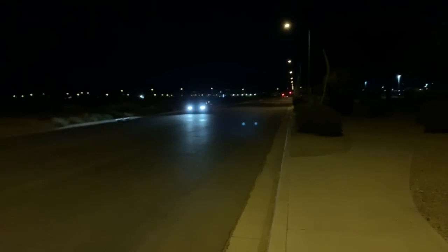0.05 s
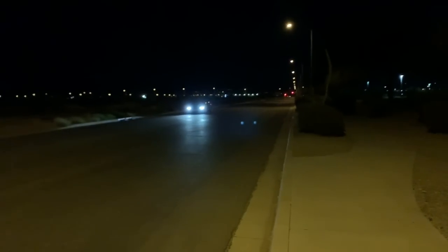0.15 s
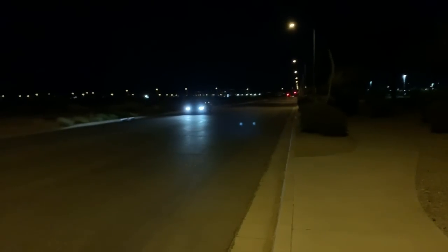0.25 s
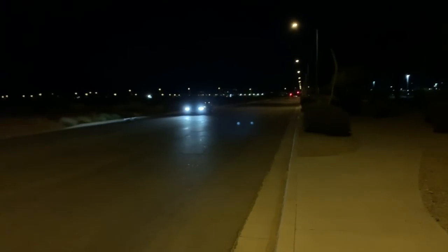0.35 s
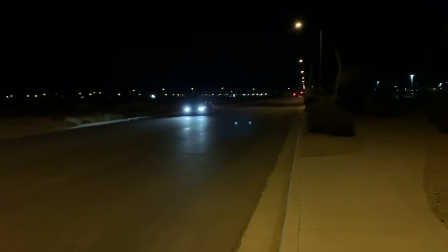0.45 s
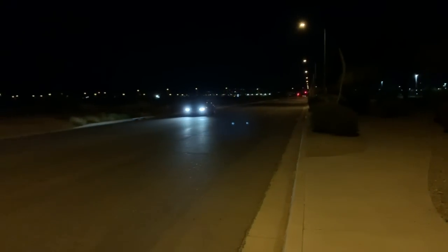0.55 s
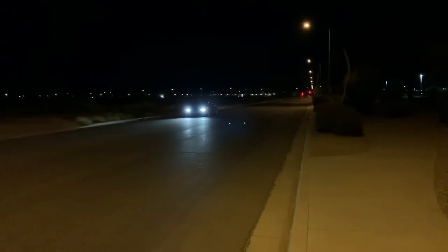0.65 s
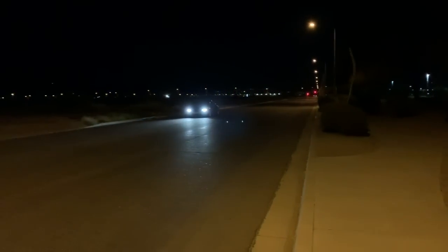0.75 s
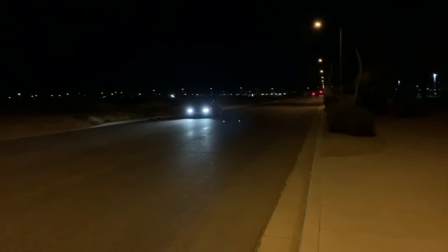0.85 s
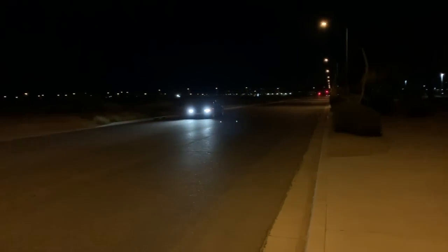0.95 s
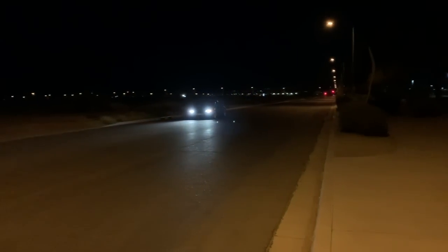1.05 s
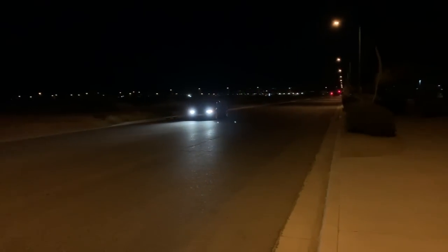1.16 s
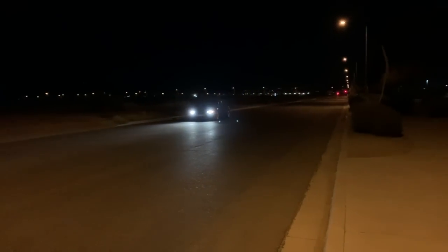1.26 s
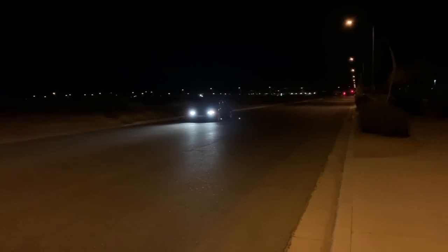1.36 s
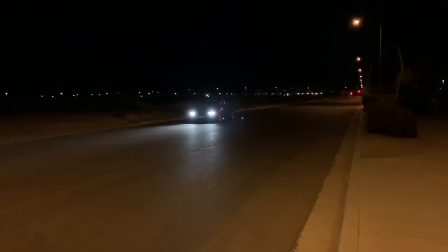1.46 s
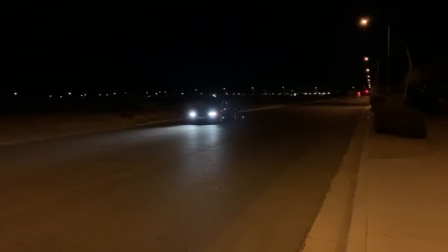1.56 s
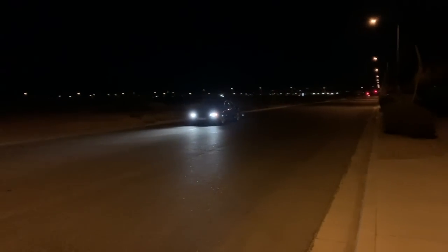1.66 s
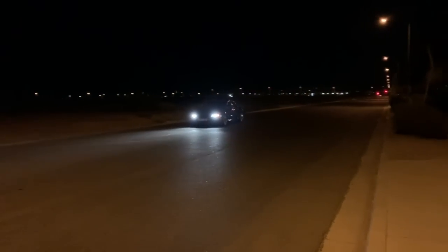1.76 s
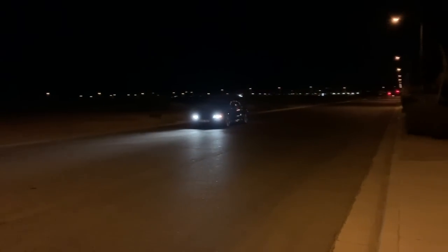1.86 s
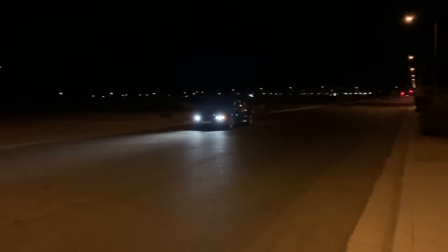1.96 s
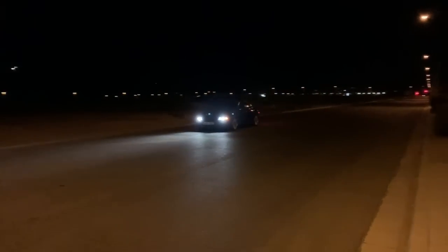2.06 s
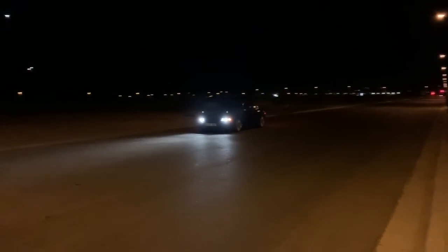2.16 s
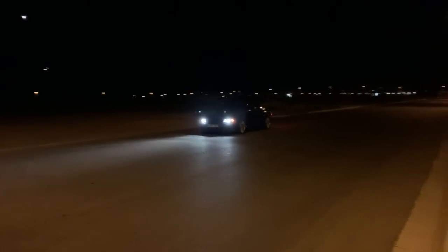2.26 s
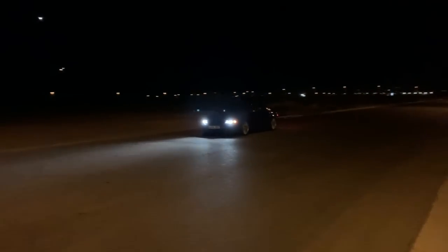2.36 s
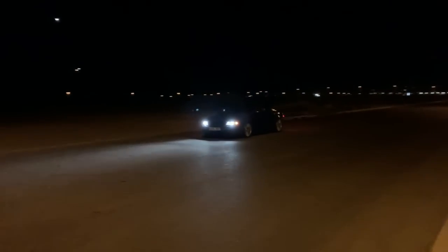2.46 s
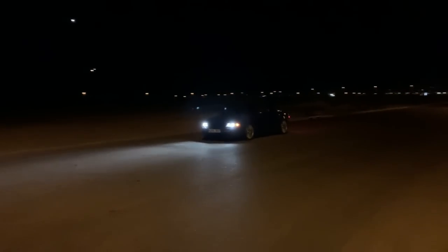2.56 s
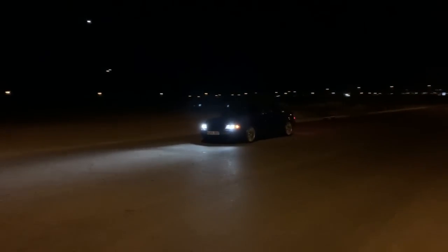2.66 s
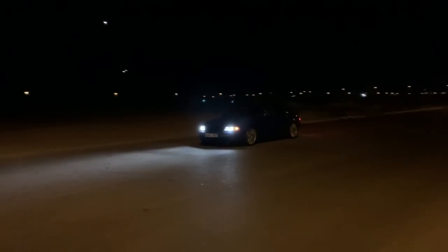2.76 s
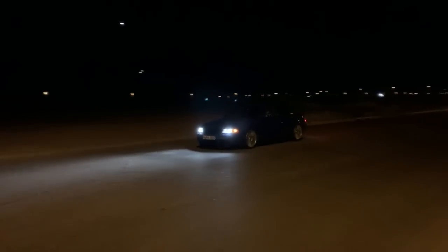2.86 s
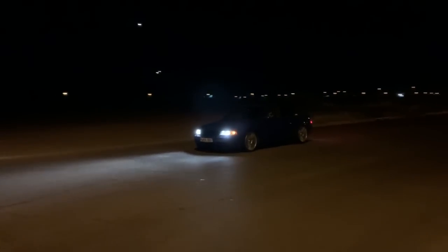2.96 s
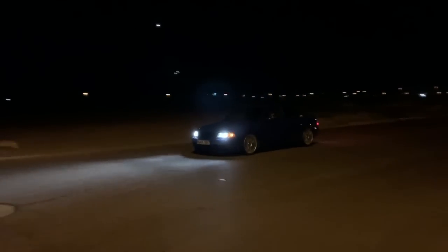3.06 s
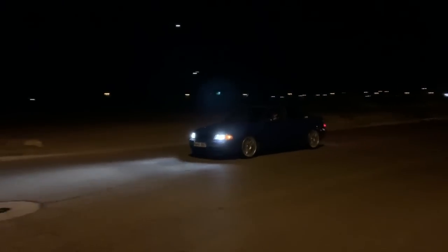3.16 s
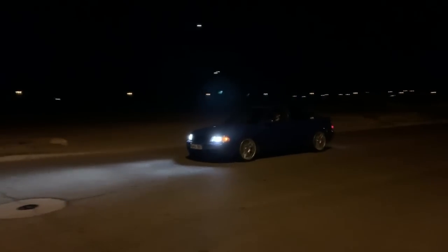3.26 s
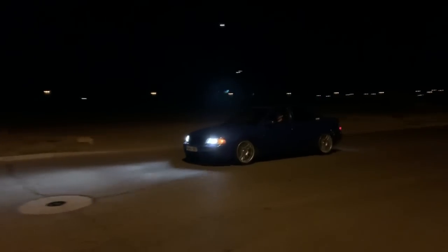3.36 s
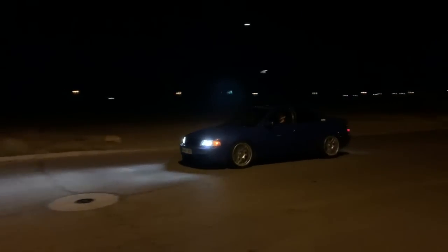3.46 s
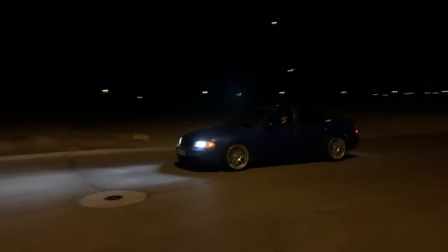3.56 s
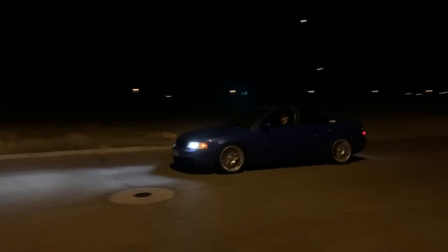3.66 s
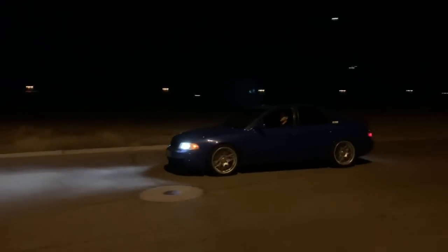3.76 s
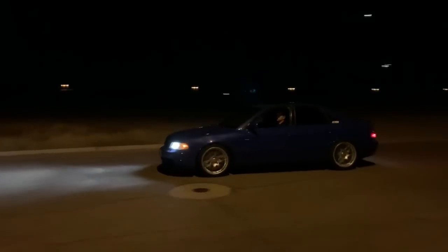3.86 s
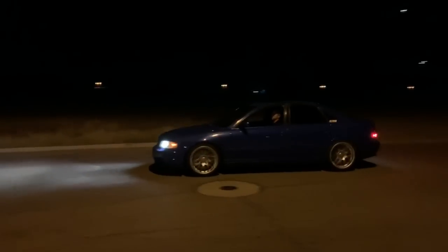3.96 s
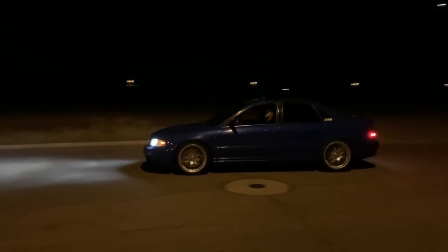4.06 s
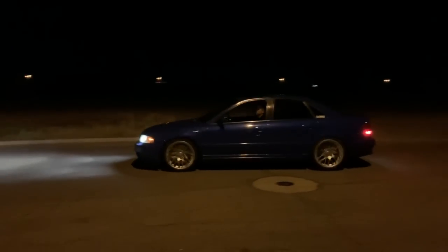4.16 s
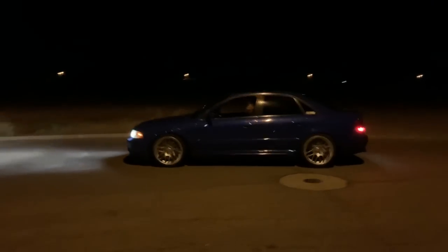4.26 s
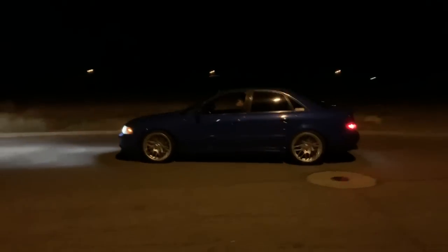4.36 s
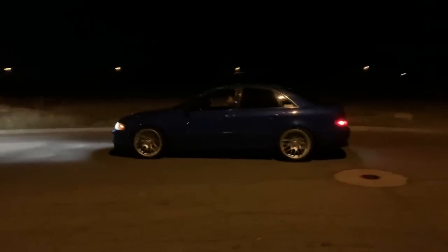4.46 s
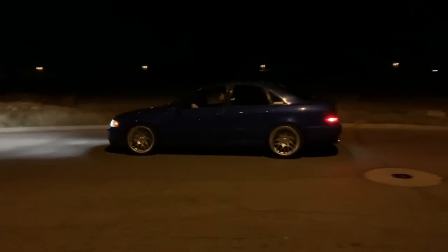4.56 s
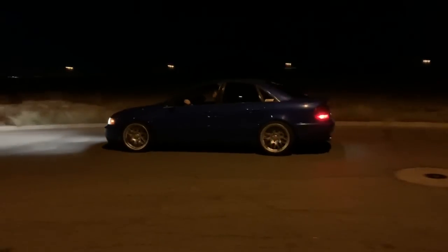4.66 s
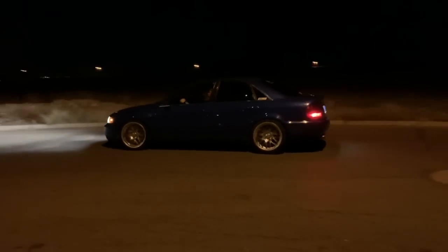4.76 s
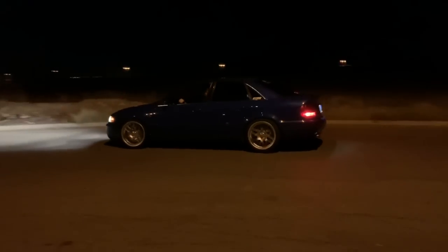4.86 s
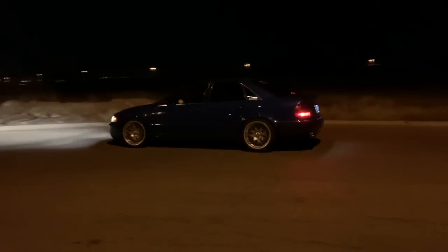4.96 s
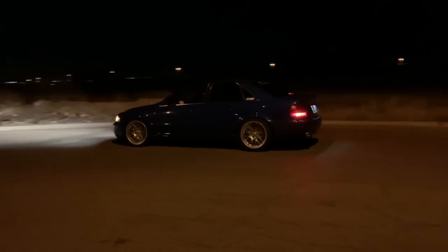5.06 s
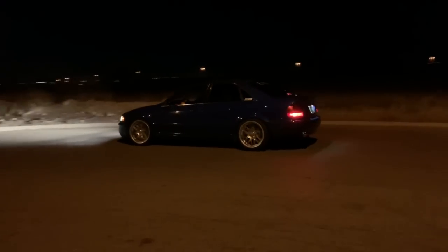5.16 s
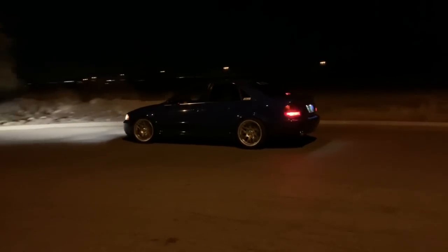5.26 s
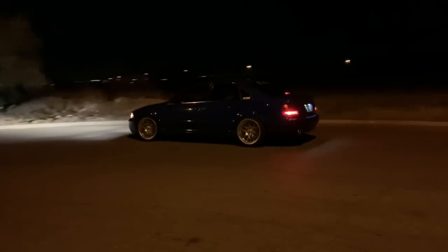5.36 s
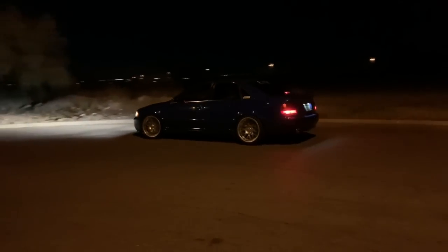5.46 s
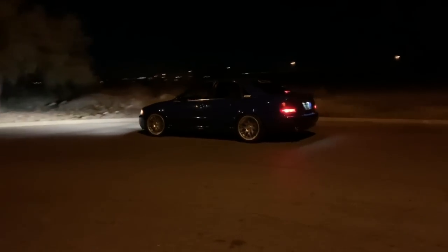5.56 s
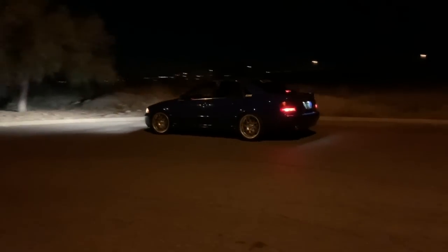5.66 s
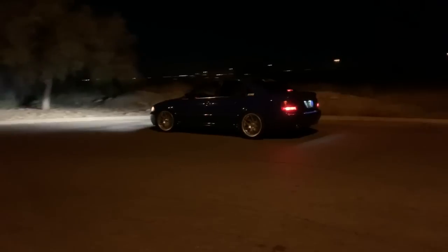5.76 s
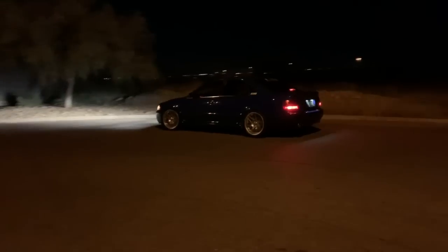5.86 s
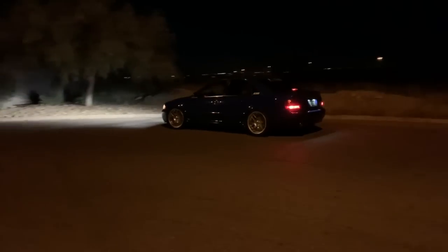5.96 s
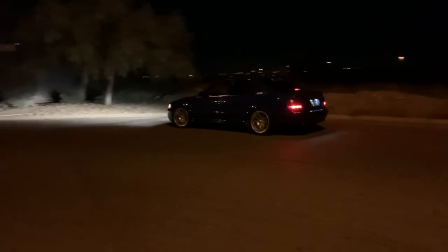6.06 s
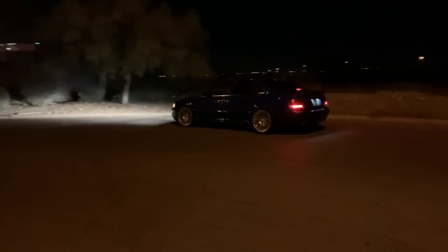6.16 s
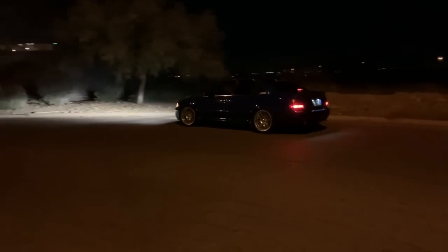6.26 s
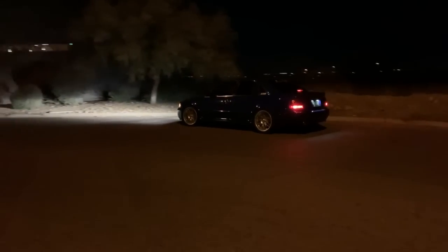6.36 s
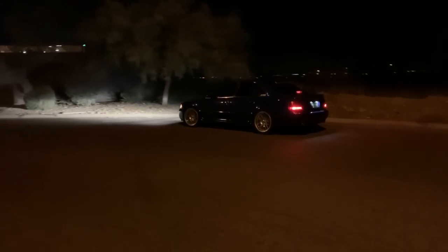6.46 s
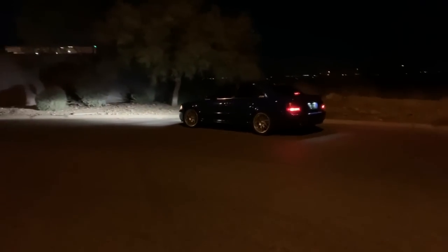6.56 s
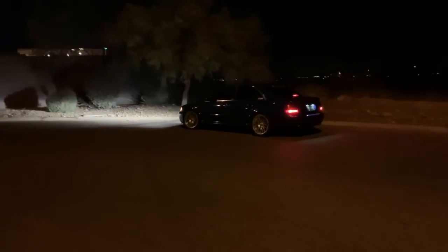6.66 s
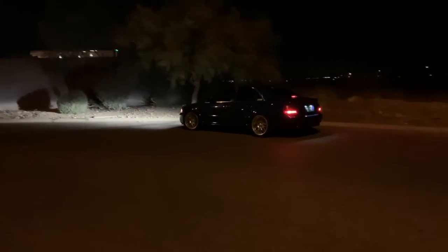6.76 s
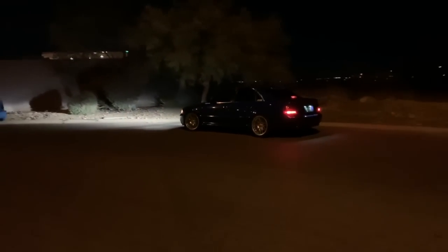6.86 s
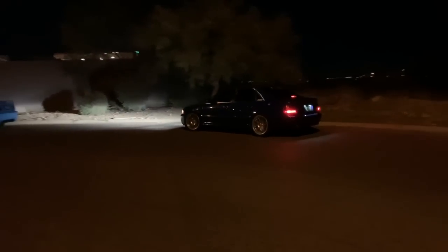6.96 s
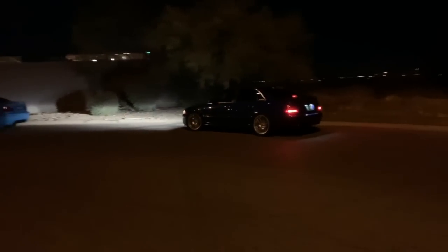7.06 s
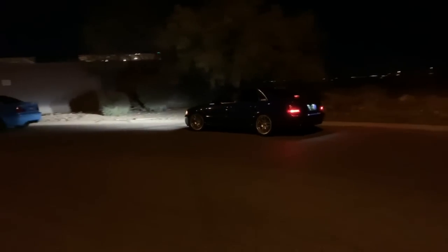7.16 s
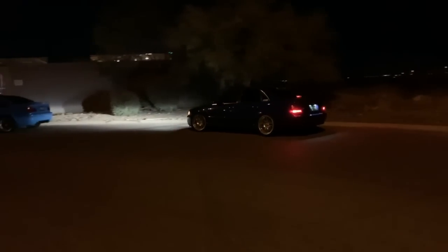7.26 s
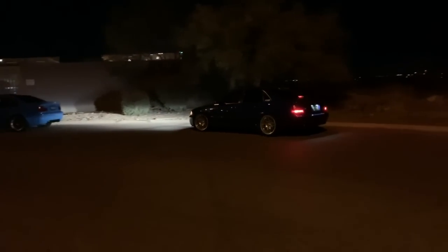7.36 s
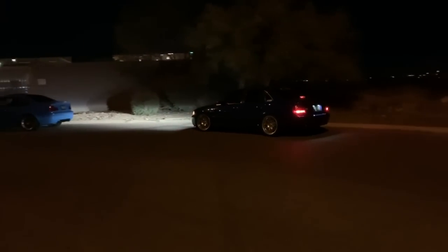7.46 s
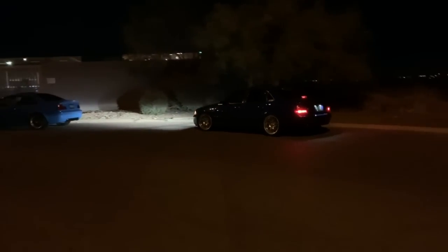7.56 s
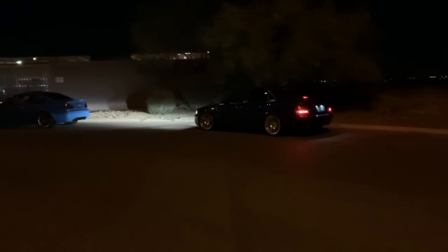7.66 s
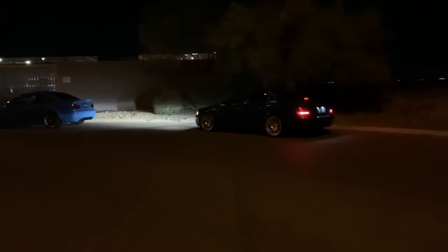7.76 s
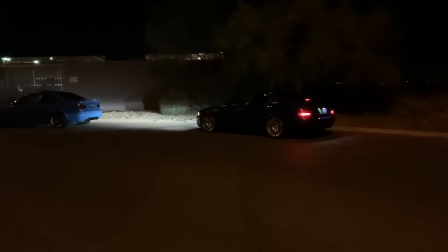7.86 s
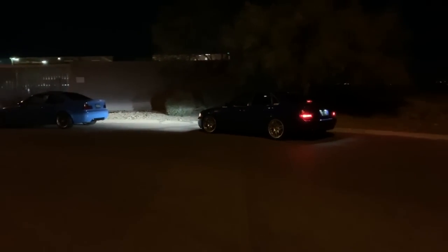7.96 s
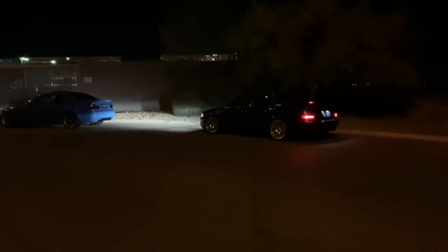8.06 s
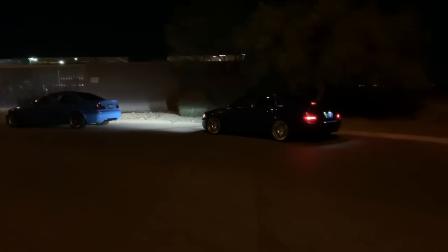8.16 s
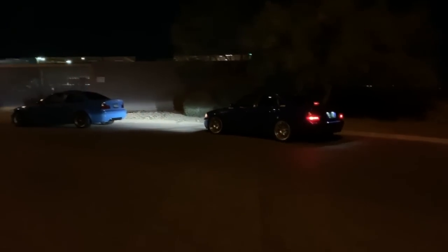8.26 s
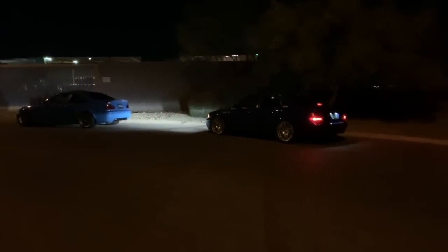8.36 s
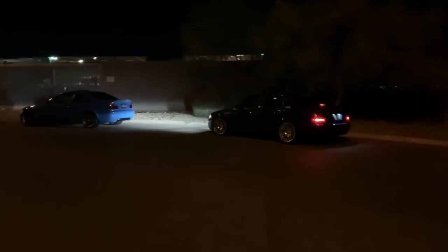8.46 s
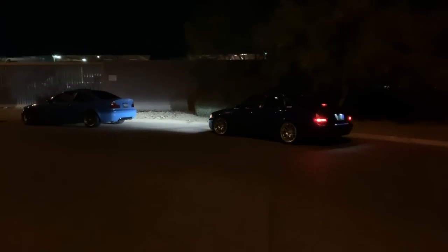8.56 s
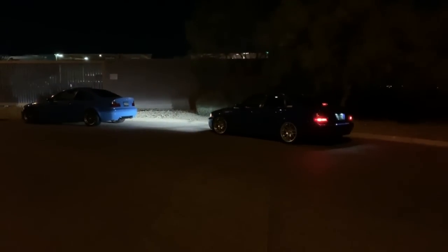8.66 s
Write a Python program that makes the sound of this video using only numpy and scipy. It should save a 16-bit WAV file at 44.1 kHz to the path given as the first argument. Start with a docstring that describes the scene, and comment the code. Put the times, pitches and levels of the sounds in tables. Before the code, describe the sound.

A turbocharged car blips its throttle, then coasts slowly past at night with dense exhaust pops, before its engine catches and settles into a lumpy idle.

```python
"""A turbocharged four-cylinder car blips its throttle, then coasts slowly past on an open road at night.
With the throttle shut, leftover fuel pops in the exhaust and rings the pipe, with a thin echo around it.
Just after the car passes, the engine catches, limps and settles to idle; near the end there is a soft scuff.
Throughout, filtered noise makes tyre roar and hissing air, and short bursts make sand and flicked grit.
Two microphone ports listen from the kerb."""
import sys
import numpy as np
from scipy import signal
from scipy.fft import rfft, irfft
from scipy.io import wavfile
from scipy.ndimage import uniform_filter1d

SR = 44100
rng = np.random.default_rng(int(sys.argv[2]) if len(sys.argv) > 2 else 0)


def store_wav(level_fs):
    """Save 16-bit WAV to argv[1]."""
    pcm = np.round(np.clip(np.atleast_2d(level_fs), -1, 1) * 32767)
    wavfile.write(sys.argv[1], SR, pcm.T.astype(np.int16))


N = 384199

# How fast the engine fires. Each row: time in seconds, firing rate in Hz.
FIRING_RATE = [(0, 42), (.35, 44), (.62, 35), (.78, 44), (1.0, 67.36), (2.0, 60.48), (2.5, 55.1),
               (3.3, 47.43), (4.3, 40.68), (4.46, 43.04), (4.56, 56.3), (4.63, 62.1), (4.72, 59.7),
               (5.02, 50.9), (5.13, 48.4), (5.4, 44.2), (5.6, 42.3), (5.94, 41.3), (6.22, 41.0),
               (6.99, 41.3), (7.43, 42.4), (7.85, 42.6), (8.71, 41.9)]
# Pops in the exhaust. Each row: start in seconds, strength in dB, sharpness from 0 (dull thump) to 1 (bang),
# extra bark in dB, lean of the bark to the tailpipe's upper modes in dB.
POPS = [(0.329, -37, 0, -3, 0), (0.587, -27, 0.3, -2, -10), (0.706, -37.5, 0.07, -6, 0),
        (1.0256, -11.5, 0.99, 3, -6), (1.066, -15, 0.96, 7, -6), (1.193, -24.5, 0.8, 2, 1),
        (1.209, -25, 0, -3, 4), (1.292, -22, 0.54, 1.5, 3), (1.352, -17.5, 0.5, -0.5, 2),
        (1.532, -18.5, .45, 3.5, 2), (1.576, -24, 0.5, 0, -9), (1.708, -23, .3, 2, 4),
        (1.72, -20, 0.3, -5, 0), (1.74, -18.5, 0.43, 0, 1), (1.781, -28.5, 0.7, 7.5, 4),
        (1.868, -21, 0.58, 1, -2), (1.925, -20.5, 0.6, 1.5, 0), (1.943, -21.5, 0.53, -3, 0),
        (2.021, -23, 0.5, -0.5, 5), (2.092, -15.5, 0.3, 3, 5), (2.231, -16.5, 0.4, 2.5, 5),
        (2.345, -22, 0.5, 4, 1), (2.409, -19.5, 0.17, 1, -5), (2.43, -21, 0.1, 0, 0),
        (2.533, -14.5, 0.53, 3, 5), (2.597, -19, 0.06, 2, -4), (2.758, -18.5, 0.12, 2, -8),
        (2.784, -21, 0.05, -1, -5), (2.798, -24, 0.4, 4.5, -3), (2.808, -17.5, 0.15, 0, 5),
        (2.967, -14.5, 0.4, -0.5, -3), (2.999, -18.5, 0.63, -3, 1), (3.05, -21.5, 0.54, 2, 3),
        (3.188, -18.5, 0.63, 4, 1), (3.196, -14.5, 0.33, 1.5, 2.5), (3.24, -17.5, 0.36, -1, 8),
        (3.391, -12.5, 0.28, -3.5, -1), (3.413, -19, 0.45, 2.5, -3), (3.445, -16.5, 0.48, -1, -1),
        (3.502, -14, 0.21, -3, 3), (3.654, -18.5, 0.2, 3.5, 13), (3.667, -15.5, 0.3, 0.5, 5),
        (3.699, -18.5, 0.56, 0.5, -3), (3.713, -14, 0.45, -0.5, 0), (3.88, -14, 0.22, 3, 8),
        (3.918, -12.5, 0.52, 4.5, 5), (3.969, -18.5, 0.24, 5, 4), (4.156, -15, 0.06, 5, -5),
        (4.18, -17, 0.34, 2, 10), (4.204, -23, 0.36, 5, 2), (4.218, -20.5, 0, 3, 0),
        (4.239, -19.5, 0.34, -2.5, 1), (4.4, -14, 0.2, 2.5, -3), (4.438, -19, 0.28, -0.5, 2),
        (4.493, -20, 0.4, -0.5, -3.5), (4.549, -24.5, 0.13, 1, -16), (4.595, -22.5, 0, -0.5, -7)]
# Hot gas carries sound faster and raises the exhaust's modes. Each row: time in seconds,
# frequency ratio of the pipe, resonance of the silencer's air cavity in Hz.
HEAT = [(1.07, 1.53, 74.4), (1.3, 1.07, 67.5), (2.9, 1.07, 59.7), (3.3, 1.045, 60.9), (4.5, 1.01, 52.7)]
# Ringing modes. Each row: frequency in Hz, width in Hz, level in dB (the width also scales the level).
# First the whole exhaust pipe, then the tailpipe, then the tailpipe's high modes rung by a sharp bang.
PIPE_MODES = [(122.3, 33.6, 3.5), (162, 71, 1.5), (264, 85, 2.5)]
TAILPIPE_MODES = [(487, 48, -12), (604, 160, -2), (739, 51, 1.5), (775, 31, 3), (1112, 114, 0),
                  (1325, 140, 1)]
BANG_MODES = [(1270, 90, -3), (1814, 110, -1), (2280, 85, 2), (2850, 60, 0), (4550, 200, -24)]
# Grit flicked by the tyres. Each row: start in seconds, relative level in dB, main frequency in Hz.
GRIT = [(1.286, -44.5, 7200), (3.272, -49, 7800), (3.535, -54, 7000), (3.956, -38, 10500),
        (4.007, -41, 10500), (4.344, -44, 10000), (4.527, -44, 10000), (4.585, -40, 11000),
        (5.441, -49, 8100), (5.743, -41.5, 2600), (5.839, -52, 8000), (5.969, -42.5, 2820),
        (6.464, -39.5, 3380), (6.701, -44, 3500), (6.7525, -41.5, 3100), (6.9695, -32.5, 3200),
        (6.998, -43, 2980), (7.45, -47, 3114), (7.464, -47, 3730), (7.733, -49, 3100), (7.8982, -45, 2200),
        (7.958, -39, 2750)]
# Swells of a faint whine. Each row: time of the top in seconds, time to fall to about a third in seconds,
# frequency at the top in Hz (before it wavers), level in dB (before it flutters).
WHINES = [(.8, .22, 1110, -48), (2.04, .24, 1000, -46), (5.3, .98, 1170, -57), (8.1, .7, 1140, -60),
          (8.2, .7, 1640, -66), (7.9, 1.1, 2820, -71)]
# The right port against the left. Each row: frequency in Hz, phase lead in radians, extra level in dB.
PORTS = [(0, 0, .7), (150, .12, .7), (400, .24, .7), (1100, .48, 0), (1600, .65, 0), (2600, 0, .5),
         (3800, -1.4, 3), (5200, -3.1, 3), (6200, -5.6, 1), (7300, -6.28, 0), (8500, -5.5, 0),
         (10400, -3.14, 0), (13200, 0, 0), (16000, 0, 0)]

# Tone colours. Each row of all the tables below: frequency in Hz, relative level in dB.
# Engine: the firing pulses, then the difference between alternate firings, which makes the idle lope.
BEAT_COLOUR = [(20, -40), (42, -3.5), (60, 0), (84, 6), (125, 5), (168, 6.5), (205, -9), (235, -12.5),
               (275, -35), (330, -28.5), (430, -43), (1500, -90.5)]
LOPE_COLOUR = [(20, -36), (62, -1), (102, 3.5), (143, -3.5), (185, -8), (230, -13.5), (280, -39),
               (430, -46.5), (1500, -87.5)]
# Engine: gas puffs, the ring of harder firings in the pipe, the low rumble.
PUFF_COLOUR = [(200, -27.5), (380, 1.5), (520, 15.5), (720, 2.0), (900, -1.5), (1150, -12.0), (1600, 3.5),
               (4000, -40.0)]
FLARE_COLOUR = [(60, -50), (130, -24), (158, 5.5), (190, -1.5), (235, 9.5), (272, -4.5), (330, -15.5),
                (450, -12), (1500, -81)]
RUMBLE_COLOUR = [(15, -27), (30, 0), (60, -4), (110, -1), (180, -5), (255, -3), (330, -15), (420, -22),
                 (700, -20), (1500, -77.5)]
# Pops: the crack of the gas jet, the tick of the manifold, the roadside echo.
CRACK_COLOUR = [(600, 0), (1100, -1.5), (1500, -10.5), (1800, 0.5), (2030, -11), (2300, -1), (2600, -21.5),
                (2880, -6), (3400, -13.5), (5200, -20.5), (8000, -22), (12000, -28.5), (15500, -65)]
TICK_COLOUR = [(2000, -25), (5000, -10), (8000, 2.5), (13000, 0), (14500, -6), (15500, -15.5)]
ECHO_COLOUR = [(60, -1), (250, -8.0), (700, 0.0), (2000, 5.0), (3700, 8.5), (5000, 14.5), (12000, -19.5)]
# Car and road: tyre roar, hissing air, the scuff, fine sand.
TYRE_COLOUR = [(200, 9), (400, -5.5), (520, 1), (720, 4), (880, -3), (1020, 7), (1180, 4.5), (1460, -5),
               (1680, -2.5), (1900, -5.5), (2300, -6.5), (2800, -12), (3400, -46), (4500, -20), (8000, -68)]
AIR_COLOUR = [(1500, 12.5), (3000, 10), (4200, 4.5), (5300, -0.5), (7000, 1.5), (8500, 1), (10000, -13.5),
              (12500, -0.5), (14500, -14), (15500, -27)]
SCUFF_COLOUR = [(200, -19), (340, 1.5), (430, -0.5), (560, 0), (800, 3.5), (1000, -5), (1250, -21),
                (1800, -20), (3000, -23.5), (6000, -43)]
SAND_COLOUR = [(1000, -4.0), (3200, -4.0), (5500, -7), (9000, 9.0), (13000, -3.0), (15500, -14.5)]

# the drive: when the car is nearest, how far off, how fast then, and the time constant of its slowing
PASSES_S, KERB_M, SPEED_M_S, SLOWING_S = 4.116, 6.71, 3.95, 2.23
# the throttle shuts after the blip, the engine catches, the idle settles; CHANGE_S sets how fast each change is
LIFT_S, CATCH_S, SETTLED_S, CHANGE_S = 0.83, 4.6, 5.39, 0.046
# a sharp ignition barks, cracks and ticks more, a slow one thumps more: dB over the range of sharpness
SHARP_BARK_DB, SHARP_CRACK_DB, SHARP_TICK_DB, DULL_THUMP_DB = 5.5, 23.5, 35.5, 15.5
# leftover fuel may go off a few firings after a pop: chance for the dullest pop, change in level, sharpness
STRAGGLER_SHARE, STRAGGLER_DB, STRAGGLER_SHARPNESS = .45, -11, 0.3
# the manifold ticks this long before the pressure wave reaches the tailpipe
PIPE_TRAVEL_S = 0.0083
# the lope is strongest at idle speed or below and fades with a power of the speed above it
IDLE_HZ, LOPE_POWER = 41, 4
# spreads: rumble surges, firing strength, ring of the firings in the pipe
SURGE_DB, SCATTER_DB, STUMBLE_DB = 2, 1.15, 2.5
# until the idle settles: size of the limp, time of one of its hardest firings, extra spread in firing time
LIMP_DB, LIMP_S, STUMBLE_S = 4.5, 5.015, .00015
# bands of tyre roar that flicker on their own: frequencies, sharpness, spread, changes per second
TREAD_HZ, TREAD_Q, TREAD_DB, TREAD_RATE = [700, 1020, 1200, 1680, 2150, 2650], 8, 1.6, 16


def scene():
    """Mix the car, its pops, their echo and the sounds of the road."""
    pops = afterfire()
    car = engine() + pops + tyre_roar() + air_hiss() + whine()
    return car + grit() + scuff() + crunch() + roadside(pops)


def engine():
    """Each firing sends a pulse through the silencer; a smooth drone lies under them until the engine catches."""
    rate_hz, = curves(FIRING_RATE)
    phase = np.cumsum(rate_hz) / SR  # counts firings
    return firings(phase, rate_hz) + throb(phase) + drone(phase) + rumble()


def firings(phase, rate_hz, lope_db=-8, lope_lag_s=0.0017, jitter_s=0.00008, gas_db=-32):
    """Pulses of varying strength and timing, with puffs of gas, ring the silencer and the pipe."""
    k = np.arange(1, int(phase[-1]) + 1)
    chance = rng.standard_normal((len(k), 3))
    due = np.interp(k, phase, np.arange(N)).astype(int)
    unsettled = (after(CATCH_S) * (1 - after(SETTLED_S)))[due]
    late = (jitter_s + STUMBLE_S * unsettled) * SR * chance[:, 0]
    at = np.clip((due + late).astype(int), 0, N - 1)
    pulses, uneven, hard = np.zeros((3, N))
    # just after the catch the strength rises and falls over every four firings
    limp = unsettled * (np.cos(np.pi / 2 * (k - phase[int(LIMP_S * SR)])) - .25)
    pulses[at] = undb(SCATTER_DB * chance[:, 1] + LIMP_DB * limp)
    # alternate firings differ, most of all at low speed
    uneven[at] = (-1) ** k * np.minimum(IDLE_HZ / rate_hz[at], 1) ** LOPE_POWER
    hard[at] = undb(STUMBLE_DB * np.clip(chance[:, 2], -2, 1))
    lope = unit(colour(np.roll(uneven, int(lope_lag_s * SR)), LOPE_COLOUR)) * undb(lope_db)
    beat = smear(unit(colour(pulses, BEAT_COLOUR)) + lope, hz=88, q=.6)
    beat_db = heard(db=-27.0, near_power=0.86, overrun_db=-12.5, astern_db=13.5)
    return (beat + undb(gas_db) * puffs(phase)) * undb(beat_db) + flare(hard)


def smear(x, hz, q):
    """All-pass filter: a chamber holds back the part of each pulse near its resonance."""
    return 2 * signal.lfilter(*signal.iirpeak(hz, q, fs=SR), x) - x


def puffs(phase):
    """Rushing gas: noise that starts strong at each firing and dies away until the next."""
    return unit(np.exp(-(phase % 1) / 0.73) * noise(PUFF_COLOUR))


def flare(hard, catch_db=-31, top_s=4.68, fade_s=.5, idle_db=-50):
    """As the engine catches, harder firings ring the pipe's upper mode; a little of it stays at idle."""
    swell = np.exp(-np.abs(np.arange(N) / SR - top_s) / fade_s)
    effort = after(CATCH_S) * (undb(catch_db) * swell + undb(idle_db))
    return unit(colour(hard, FLARE_COLOUR)) * effort


def throb(phase, db=-19.0, top_s=4.68, fade_s=0.1, lag_turns=.15):
    """The first full firings throb in the silencer: a short swell of tone at the firing rate."""
    swell = after(CATCH_S) * np.exp(-np.abs(np.arange(N) / SR - top_s) / fade_s)
    return unit(np.sin(2 * np.pi * (phase - lag_turns))) * undb(db) * swell


def drone(phase):
    """A smooth tone at twice the firing rate, with faint tones at three and four times, until the catch."""
    tone = np.sin(4 * np.pi * phase)
    tone = tone + undb(-21) * np.sin(6 * np.pi * phase) + undb(-17.0) * np.sin(8 * np.pi * phase)
    level_db = heard(db=-27.3, near_power=1.44, overrun_db=4)
    return unit(tone) * (1 - after(CATCH_S)) * undb(level_db + 1.3 * walk(14))


def rumble():
    """Low noise that surges unevenly."""
    level_db = heard(db=-32, near_power=0.58, pace_power=0.21, overrun_db=4.5)
    return noise(RUMBLE_COLOUR) * undb(level_db + SURGE_DB * walk(21))


def afterfire(thump_db=-9.5, boom_db=0., bark_db=-12, crack_db=-37, bang_db=-40, tick_db=-51,
              cavity_width_hz=11, damping_db=2, detune=0.019, bark_near_power=0.49, shade=0.24,
              push_s=0.0007, swell_s=0.0072, sputter=0.058, sputter_s=0.0091,
              crack_s=0.056, snap_s=0.004, snap=2.6, tick_s=0.014):
    """Each pop ticks in the manifold, cracks, barks in the tailpipe, booms down the pipe and thumps the silencer."""
    out = np.zeros(N)
    near_db = drive()[0]
    heats, cavities_hz = curves(HEAT)
    t = np.arange(SR // 8) / SR
    push = t * np.exp(-t / push_s)
    # the standing wave needs a round trip to build up
    swell = 1 - np.exp(-t / swell_s)
    for s, strength_db, sharpness, extra_db, lean_db in ignitions():
        chance = rng.standard_normal((4, len(t)))
        own = 1 + detune * chance[2]  # each pop is slightly out of tune
        heat, cavity_hz = heats[int(s * SR)], cavities_hz[int(s * SR)]
        damping = undb(damping_db * chance[2, -1])
        near = near_db[int(s * SR)]

        cavity = swell * ring([(cavity_hz, cavity_width_hz, 0)], t, own[0], 1)
        pipe = swell * ring(PIPE_MODES, t, heat * own[1], -0.86, damping)
        boom = -signal.fftconvolve(pipe, push)[:len(t)]
        # a sharp ignition, then the flame sputters out
        flame = sputter * chance[0] * np.exp(-t / sputter_s)
        flame[0] = 1
        bark = signal.fftconvolve(ring(TAILPIPE_MODES, t, own[2], 1.0, damping), flame)[:len(t)]
        # at a distance the car's body shades the tailpipe's upper modes
        bark = colour(bark, [(250, -33.0), (400, 3.0), (490, 17.5), (800, 8.5 + lean_db + shade * near),
                             (1400, -6 + shade * near), (2200, -27.5), (5000, -3.5), (12000, -45.5)])
        bang = ring(BANG_MODES, t, 0.92, -1.07)
        jet = chance[1] * (np.exp(-t / crack_s) + snap * np.exp(-t / snap_s))
        crack = colour(jet, CRACK_COLOUR)
        tick = colour(chance[3] * np.exp(-t / tick_s), TICK_COLOUR)

        dull_db = DULL_THUMP_DB * np.clip(1 - sharpness, 0, 1) ** 4
        sharp_bark_db = extra_db + SHARP_BARK_DB * sharpness + bark_near_power * near
        sharp_crack_db = SHARP_CRACK_DB * sharpness
        sharp_tick_db = SHARP_TICK_DB * min(sharpness, .65) + 2.8 * near
        for part, db in ((cavity, thump_db + dull_db), (boom, boom_db), (bark, bark_db + sharp_bark_db),
                         (bang, bang_db + sharp_crack_db), (crack, crack_db + sharp_crack_db)):
            add(out, s, burst(part) * undb(strength_db + db))
        add(out, s - PIPE_TRAVEL_S, burst(tick) * undb(strength_db + tick_db + sharp_tick_db))
    return out


def ignitions():
    """All the pops; a slow one leaves fuel that may go off again one to three firings later."""
    stragglers = []
    for (s, db, sharpness, *_), (luck, wait) in zip(POPS, rng.random((len(POPS), 2))):
        if luck < STRAGGLER_SHARE * (1 - sharpness):
            delay_s = (1 + int(3 * wait)) / np.interp(s, *np.transpose(FIRING_RATE))
            stragglers.append((s + delay_s, db + STRAGGLER_DB, STRAGGLER_SHARPNESS, 0, 0))
    return POPS + stragglers


def ring(modes, t, ratio, flip, damping=1):
    """Damped modes; with a negative flip neighbours oppose, as at the far end of a pipe."""
    total = 0
    for k, (hz, width_hz, db) in enumerate(modes):
        decay = np.exp(-np.pi * width_hz * damping * t)
        total = total + flip ** k * undb(db) * width_hz * decay * np.cos(2 * np.pi * hz * ratio * t)
    return total


def tyre_roar():
    """Tyres on the road: noise that swells as the car comes near and weakens as it slows."""
    roar_db = heard(db=-34.5, near_power=0.95, pace_power=0.83)
    return flicker(wide(TYRE_COLOUR, side_db=-20.5)) * undb(roar_db + 0.92 * walk(12))


def flicker(x):
    """Narrow bands of the tyre roar rise and fall as the road's texture changes."""
    out = x
    for hz in TREAD_HZ:
        band = signal.lfilter(*signal.iirpeak(hz, TREAD_Q, fs=SR), x)
        out = out + band * (undb(TREAD_DB * walk(TREAD_RATE)) - 1)
    return out


def air_hiss(air_db=7.5):
    """Air hisses from the engine bay, swelling as the car comes near; distance dulls it."""
    low_pass = signal.butter(4, 8600, fs=SR, output="sos")
    dull = signal.sosfilt(low_pass, wide(AIR_COLOUR, side_db=-3.5))
    bright = wide(AIR_COLOUR, side_db=-9.0)
    share = undb(brightness())
    return (dull * np.sqrt(1 - share ** 2) + bright * share) * undb(hiss_level() + air_db + 1.3 * walk(13.0))


def hiss_level(turbo_db=3):
    """Base level of the hiss in dB: it gains most while the turbo spins."""
    return heard(db=-56.0, near_power=0.78, pace_power=0.24, astern_db=-8.5) + turbo_db * turbo()


def brightness(turbo_db=13.5):
    """Share of the hiss, in dB, that keeps its top: all of it close by with the turbo spinning."""
    return np.minimum(heard(db=-5.5, near_power=1.2) + turbo_db * turbo(), 0)


def turbo(spool_s=0.28, run_down_s=0.25):
    """Speed of the turbo, 0-1: it spools up around the throttle lift and runs down after the engine catches."""
    t = np.arange(N) / SR
    spool = .5 + .5 * np.tanh((t - LIFT_S) / spool_s)
    return spool * np.exp(-np.maximum(t - CATCH_S, 0) / run_down_s)


def whine(waver_hz=18, sag_hz_per_s=55, flutter_db=4):
    """Thin, unsteady tones come and go over the tyre roar, each sagging in pitch."""
    out = np.zeros(N)
    for s, length_s, hz, db in WHINES:
        t = np.arange(N) / SR - s
        phase = np.cumsum(hz - sag_hz_per_s * t + waver_hz * walk(60)) / SR
        out += unit(np.sin(2 * np.pi * phase)) * np.exp(-(t / length_s) ** 2) * undb(db)
    return out * undb(flutter_db * walk(24.5))


def grit(grit_db=-10, snap_s=.0008, scrape=.19, decay_s=0.008):
    """Small stones snap from under the tread, then scrape briefly: short bursts of coloured noise."""
    out = np.zeros(N)
    t = np.arange(SR // 20) / SR
    fade = np.exp(-t / snap_s) + scrape * np.exp(-t / decay_s)
    for s, db, hz in GRIT:
        push = rng.standard_normal(len(t)) * fade
        stone = colour(push, [(hz * .1, -12), (hz * 0.33, -4), (hz * 0.55, -6), (hz, 0), (hz * 1.35, 0),
                              (hz * 1.57, -18), (hz * 4, -40)])
        add(out, s, burst(stone) * undb(db + grit_db))
    return out


def scuff(at_s=7.662, knock_s=0.019, knock_db=-35, rub_s=0.03, rub_db=-41):
    """A dull knock and a brief rub as the car turns in: low-passed noise under two short swells."""
    t = np.arange(N) / SR - at_s
    knock = undb(knock_db) * (t > 0) * np.exp(-np.abs(t) / knock_s)
    rub = undb(rub_db) * np.exp(-(t / rub_s - 1) ** 2)
    thud = (knock + rub) * noise(SCUFF_COLOUR)
    return signal.sosfilt(signal.butter(2, 3000, fs=SR, output="sos"), thud)


def crunch(count=300, spread_db=-1.5, level_db=-11):
    """Fine sand ticks under the rolling tyres at random moments, louder when they are near."""
    near_db = hiss_level() + .5 * brightness()
    ticks = np.zeros(N)
    where, size = rng.random((count, 2)).T
    ticks[(where * N).astype(int)] = undb(-spread_db * np.log(np.maximum(size, .03)))
    t = np.arange(SR // 100) / SR
    grains = signal.fftconvolve(ticks, np.exp(-t / 0.00045))[:N] * rng.standard_normal(N)
    return unit(colour(grains, SAND_COLOUR)) * undb(near_db + level_db)


def roadside(x, echo_db=-15, t60_s=0.93, first_s=0.0014):
    """Kerbs, bushes and a wall scatter a thin echo back: a fading tail of noise for each channel."""
    t = np.arange(SR) / SR
    shape = np.clip(t / first_s - 1, 0, 1) * undb(-60 * t / t60_s)
    tails = rng.standard_normal((2, SR)) * shape / np.sqrt(np.sum(shape ** 2))
    x = colour(x, ECHO_COLOUR)
    return undb(echo_db) * np.array([signal.fftconvolve(x, tail)[:N] for tail in tails])


def heard(db, near_power, pace_power=0, overrun_db=0, astern_db=0):
    """Level in dB of a part of the car, set by nearness, road speed, the overrun and the view from behind."""
    near_db, pace_db, astern = drive()
    overrun = after(LIFT_S) - after(CATCH_S)
    return db + near_power * near_db + pace_power * pace_db + overrun_db * overrun + astern_db * astern


def drive():
    """Nearness and road speed in dB against the moment of passing, and how the tailpipe faces the kerb (0-1)."""
    pace = np.exp((PASSES_S - np.arange(N) / SR) / SLOWING_S)
    along = SPEED_M_S * SLOWING_S * (1 - pace)
    distance = np.hypot(along, KERB_M)
    return 20 * np.log10(KERB_M / distance), 20 * np.log10(pace), np.maximum(along / distance, 0) ** 2


def after(s):
    """A smooth switch from 0 to 1 around time s."""
    return .5 + .5 * np.tanh((np.arange(N) / SR - s) / (2 * CHANGE_S))


def undb(db):
    """Decibels to gain."""
    return 10 ** (np.asarray(db) / 20)


def curves(table):
    """Each column of a timed table, sample by sample."""
    s, *columns = np.transpose(table)
    return [np.interp(np.arange(N) / SR, s, c) for c in columns]


def unit(x):
    """Scale to an rms (average strength) of 1."""
    return x / np.sqrt(np.mean(x ** 2))


def burst(x):
    """Scale a short sound to the energy of 20 ms at an rms of 1."""
    return x * np.sqrt(.02 * SR / np.sum(x ** 2))


def add(track, s, x):
    """Mix a short sound in at time s."""
    start = int(s * SR)
    track[start:start + len(x)] += x[:N - start]


def walk(rate):
    """Random levels held 1 / rate seconds and smoothed twice; spread near 1."""
    k = int(SR / rate)
    steps = np.repeat(rng.standard_normal(N // k + 1), k)
    return 1.3 * uniform_filter1d(uniform_filter1d(steps, k), k)[:N]


def colour(x, spectrum, size=16384):
    """Filter with the given tone colour; folding the cepstrum keeps the response from starting early."""
    hz, db = np.transpose(spectrum)
    gain = undb(np.interp(np.log(np.fft.rfftfreq(size, 1 / SR) + 1), np.log(hz), db))
    cepstrum = irfft(np.log(gain))
    cepstrum[1:size // 2] *= 2
    cepstrum[size // 2 + 1:] = 0
    response = irfft(np.exp(rfft(cepstrum)))[:size // 2]
    return signal.fftconvolve(x, response)[:len(x)]


def noise(spectrum):
    """Coloured noise with an rms of 1."""
    return unit(colour(rng.standard_normal(N), spectrum))


def wide(spectrum, side_db):
    """Noise from a spread-out source: two channels that are partly alike."""
    return noise(spectrum) + undb(side_db) * noise(spectrum) * np.array([[1], [-1]])


def record(dry):
    """Two ports hear the sound with different phase and level; the top is cut above 15400 Hz."""
    hz, *columns = np.transpose(PORTS)
    lead, db = (np.interp(np.fft.rfftfreq(N, 1 / SR), hz, c) for c in columns)
    dry = dry * signal.windows.tukey(N, .001)  # very short fades at both ends
    left = irfft(rfft(dry[0]) * undb(-db / 2), N)
    right = irfft(rfft(dry[1]) * undb(db / 2) * np.exp(1j * lead), N)
    low_pass = signal.ellip(8, .2, 80, 15400, fs=SR, output="sos")
    return signal.sosfilt(low_pass, np.array([left, right]))


dry = scene()
out = record(dry)
store_wav(out)
```